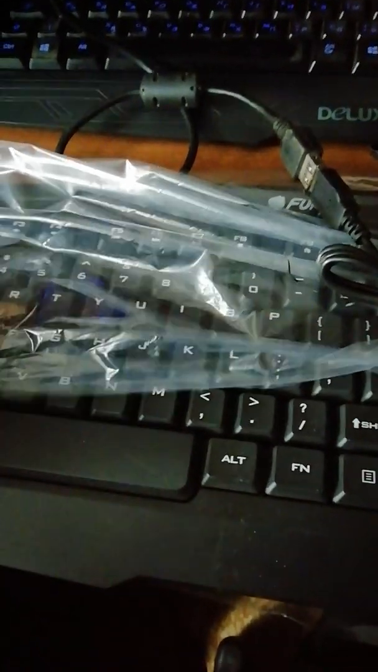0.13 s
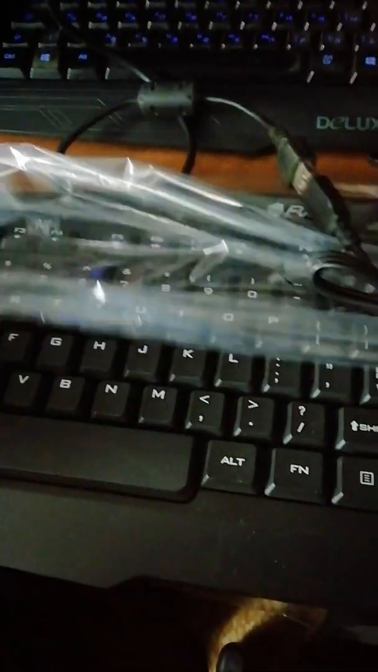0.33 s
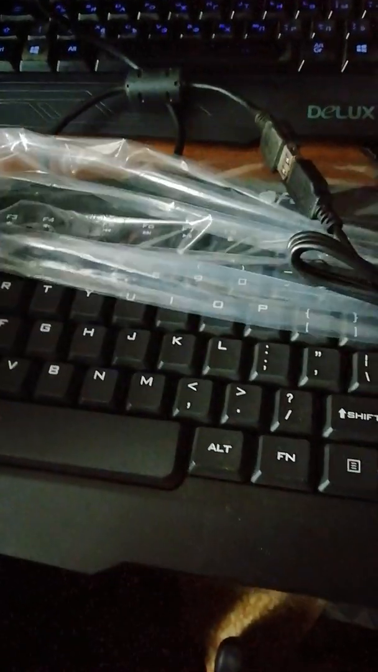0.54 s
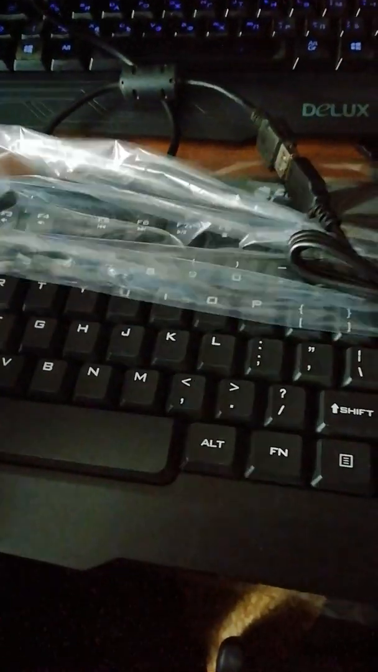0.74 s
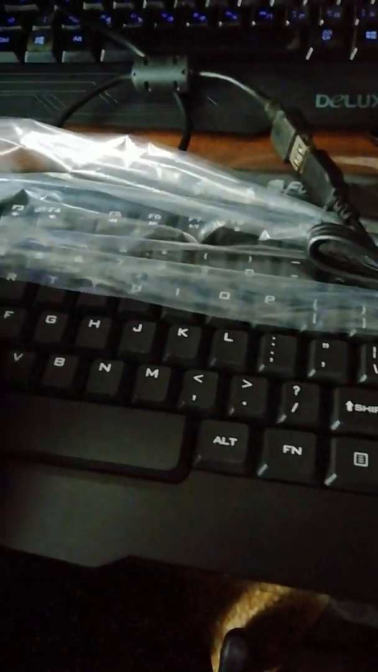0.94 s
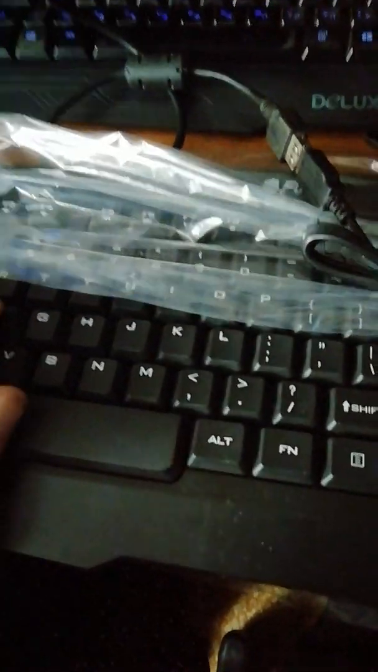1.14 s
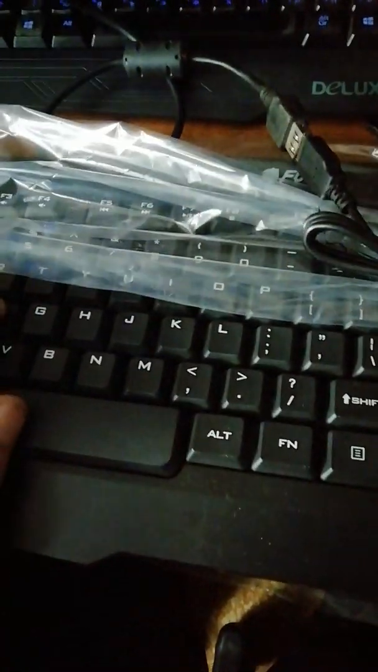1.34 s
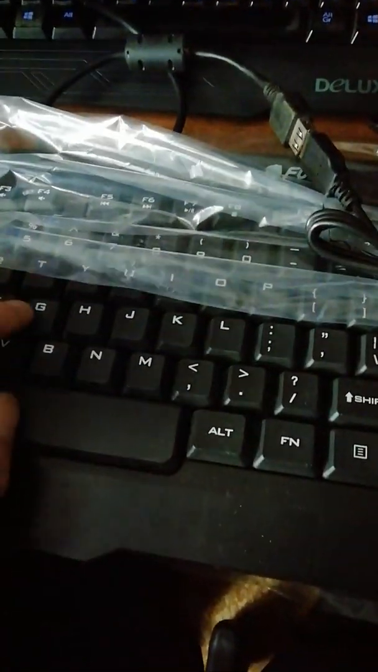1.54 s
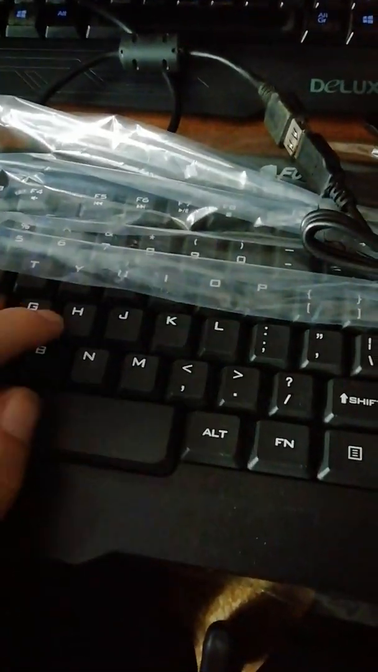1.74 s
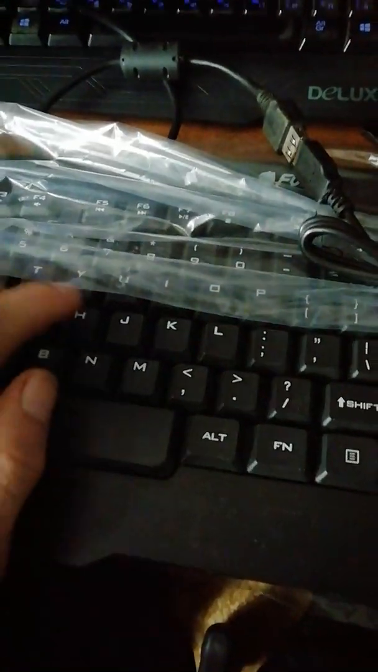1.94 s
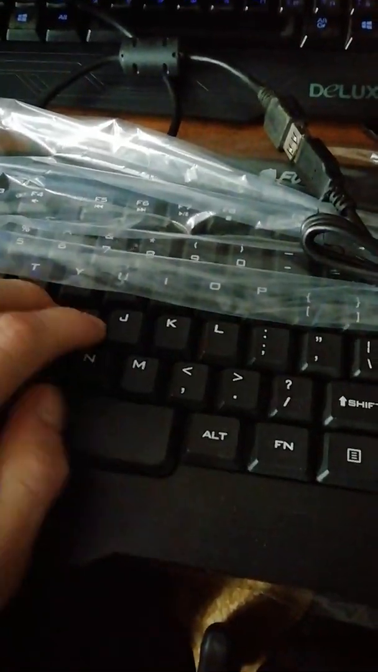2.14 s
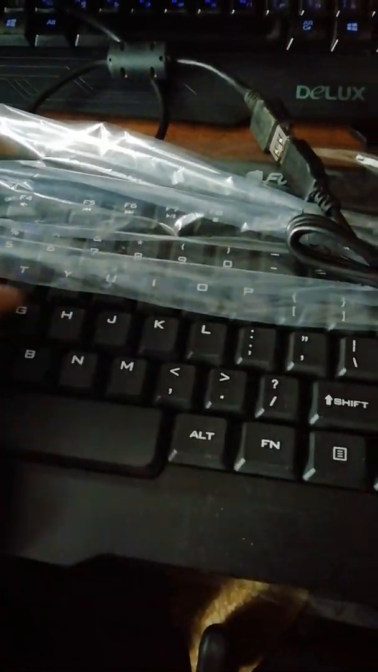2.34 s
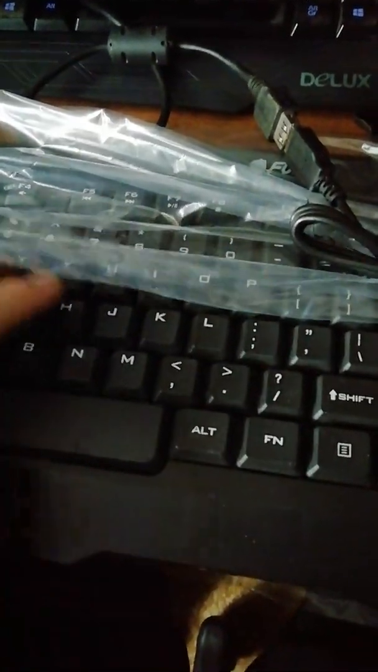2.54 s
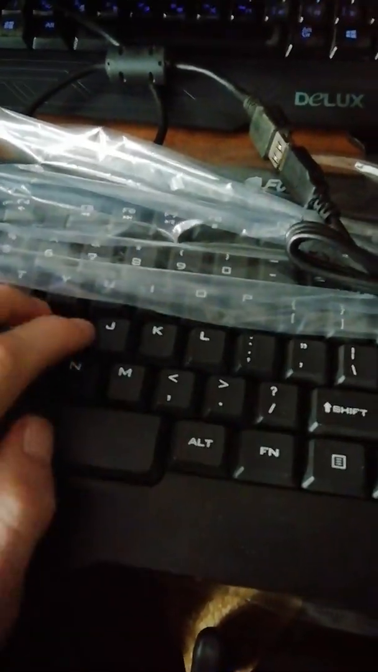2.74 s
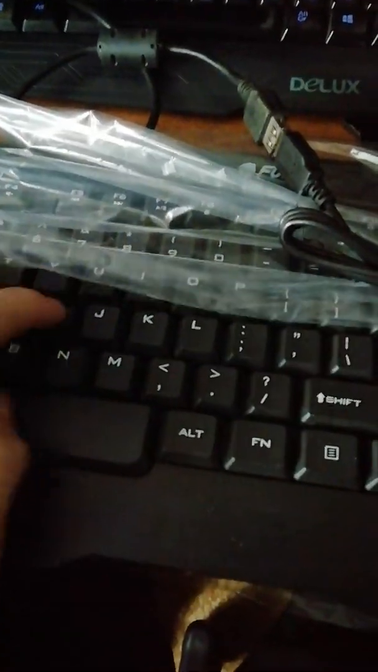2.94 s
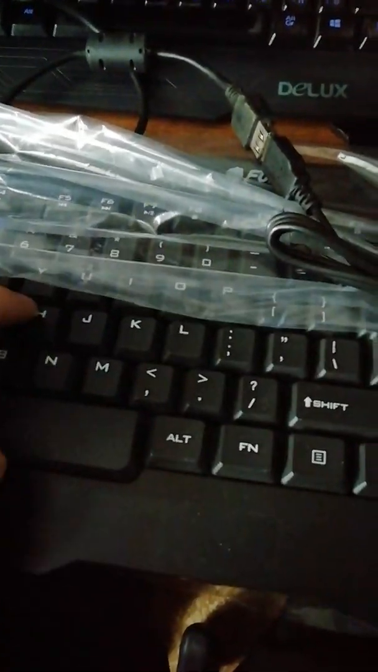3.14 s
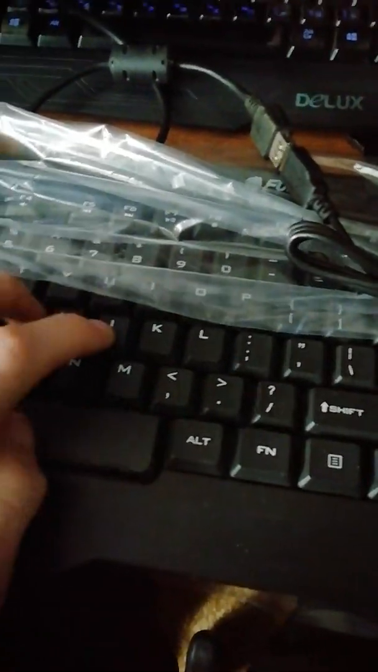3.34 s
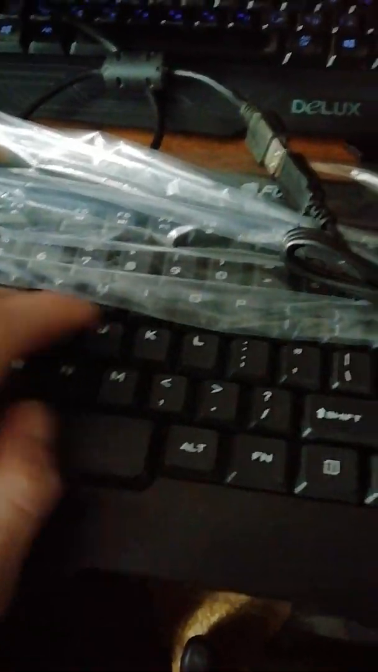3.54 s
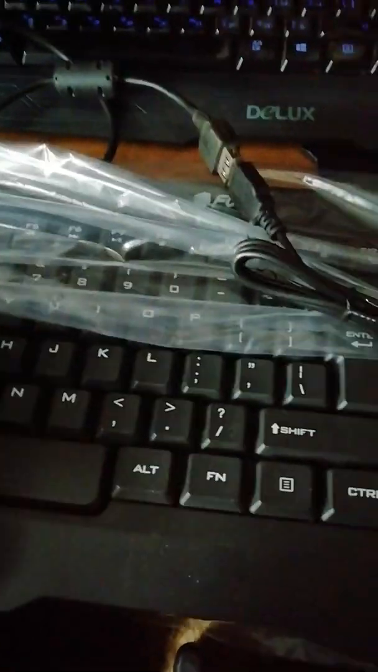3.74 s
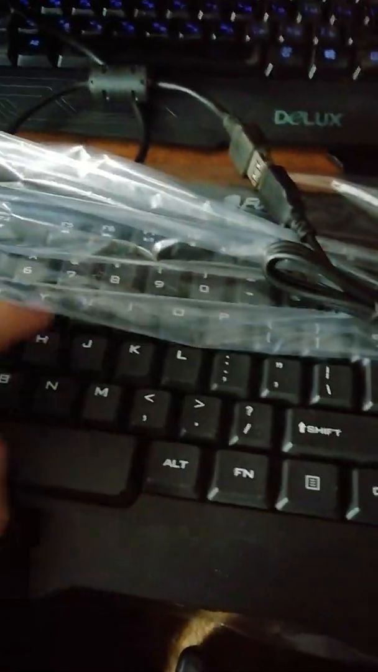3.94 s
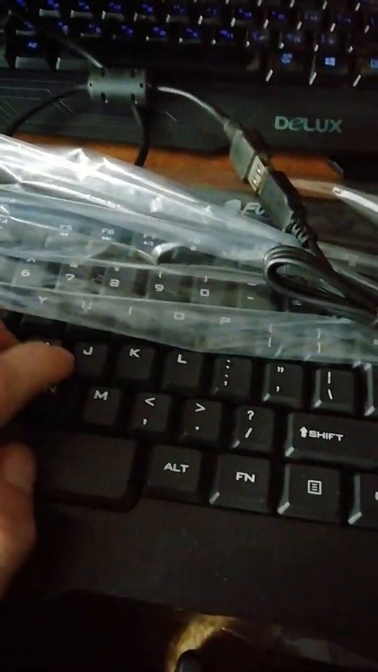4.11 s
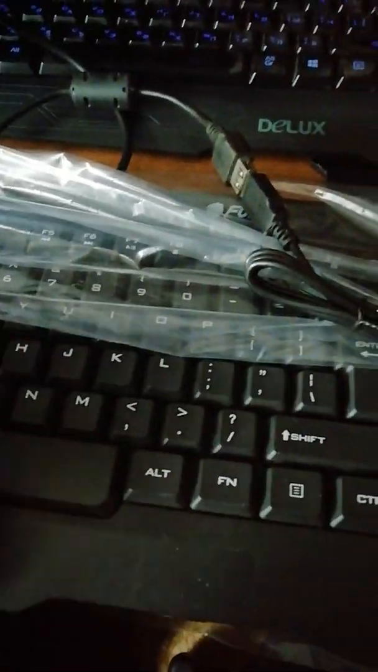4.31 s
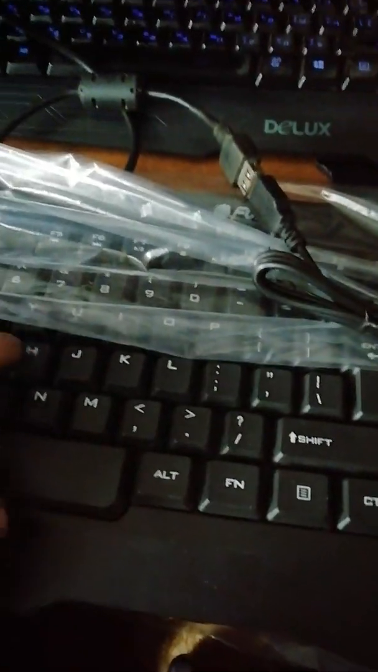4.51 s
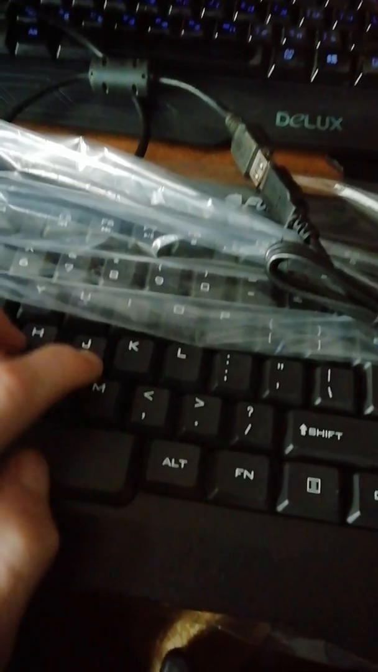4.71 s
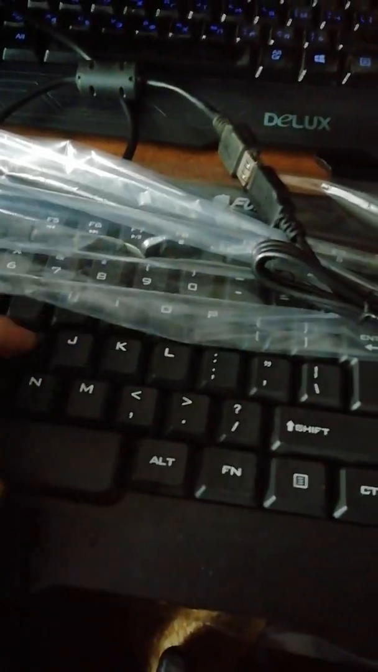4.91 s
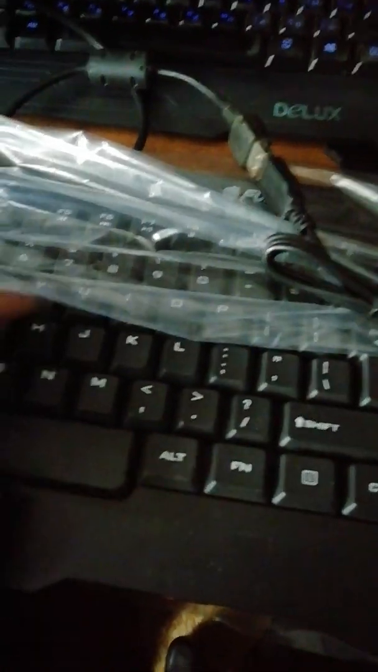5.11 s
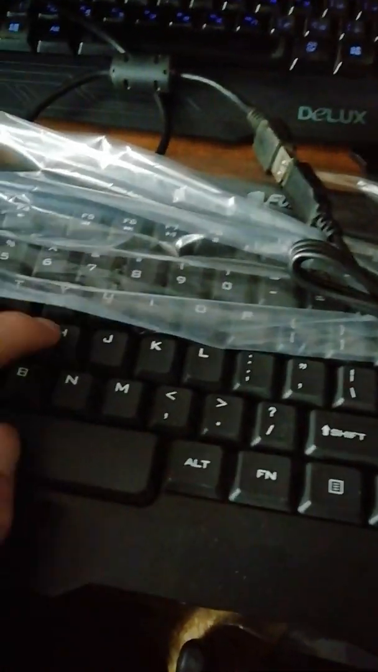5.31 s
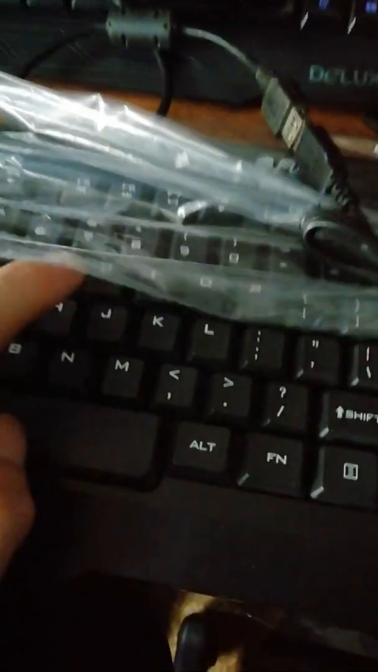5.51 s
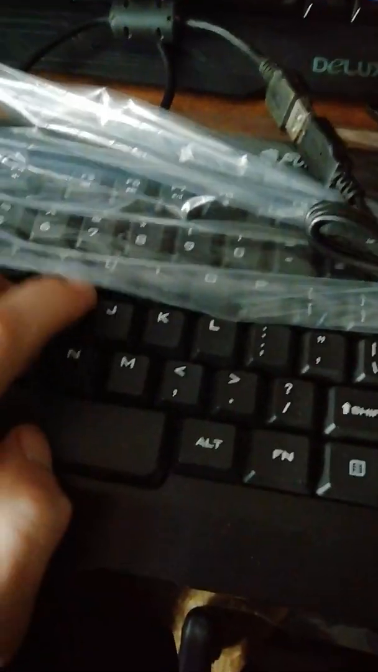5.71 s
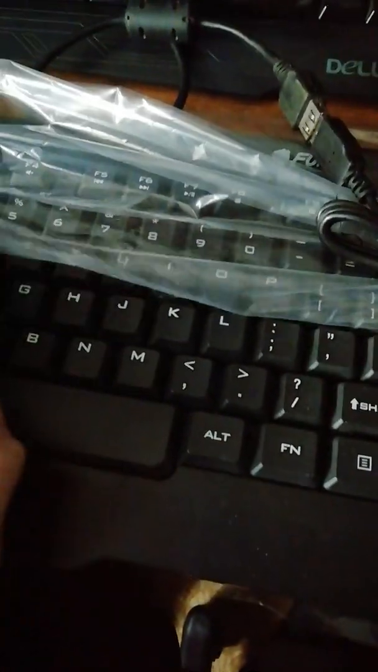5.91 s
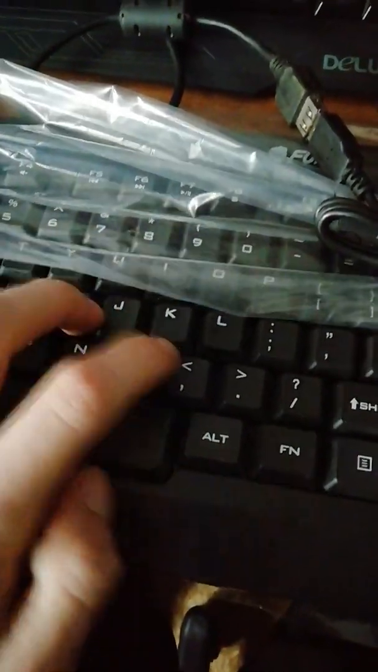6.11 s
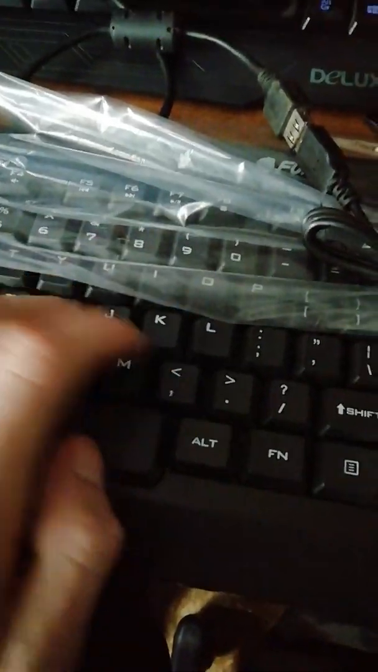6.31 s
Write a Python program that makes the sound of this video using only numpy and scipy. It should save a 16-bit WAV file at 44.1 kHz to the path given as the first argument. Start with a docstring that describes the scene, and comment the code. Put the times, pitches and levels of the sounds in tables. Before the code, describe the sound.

Close crackle of plastic wrap, then hollow, clacky keyboard presses, sparse at first and soon fast and irregular, over faint room hum.

```python
"""In a small quiet room, a thin plastic cover is pushed back, crinkling, off a computer keyboard; then
fingers type in quick uneven runs. Each key contact is a short noise rattle ringing the case and the cap.
Pushing and soft rustles are crackling noise, creases snap in short bright bursts; dull thuds mark the hand.
A hand-held camera hears it closely through two ports that ring in the treble, over air, hum and rumble."""
import sys
import numpy as np
from scipy import signal
from scipy.fft import rfft, irfft, next_fast_len
from scipy.io import wavfile
from scipy.ndimage import map_coordinates

SR = 44100
rng = np.random.default_rng(int(sys.argv[2]) if len(sys.argv) > 2 else 0)


def store_pcm(level_fs):
    """Save levels as 16-bit WAV."""
    pcm = np.round(np.clip(level_fs, -1, 1) * 32767).astype(np.int16)
    wavfile.write(sys.argv[1], SR, np.atleast_2d(pcm).T)


N = 284621  # length in samples
APPROACH_S = .015  # room left before each contact for its sound to swell
TOP_HZ = 16300  # the camera's band limit


def amp(db):
    """Turn decibels into a gain."""
    return 10 ** (np.asarray(db) / 20)


def unit(x):
    """Scale a sound to an rms of 1."""
    return x / np.sqrt(np.mean(x ** 2) + 1e-20)


def along(points, hz):
    """Read a table of (Hz, value) points, with straight lines between them on a log frequency axis."""
    point_hz, values = np.transpose(points)
    return np.interp(np.log(hz + 1), np.log(point_hz + 1), values)


def level(rows):
    """Turn (seconds, dB) rows into a gain for each sample, silent outside the rows."""
    s, db = np.transpose(rows)
    return np.interp(np.arange(N) / SR, s, amp(db), left=0, right=0)


def filtered(x, response):
    """Multiply the spectrum of x by a response that depends on frequency."""
    length = x.shape[-1]
    padded = next_fast_len(length + length // 8)
    spectrum = rfft(x, padded) * response(np.fft.rfftfreq(padded, 1 / SR))
    return irfft(spectrum, padded)[..., :length]


def port_db(hz):
    """The air in each microphone port resonates, lifting the treble around one frequency."""
    centre_hz, width_hz, peak_db = 8570, 750, 11.5
    return peak_db / (1 + ((hz - centre_hz) / width_hz) ** 2)


def tinted(x, colour):
    """Give a steady sound its colour, heard through the ports, at an rms of 1."""
    return unit(filtered(x, lambda hz: amp(along(colour, hz) + port_db(hz))))


def ring(colour, uneven_db, edge_db, size=2048):
    """How a struck part rings: its colour plus random peaks and dips, heard through the ports."""
    hz = np.fft.rfftfreq(size, 1 / SR)
    spot = map_coordinates(rng.standard_normal(64), [np.sqrt(hz) / 4])
    spot = spot / (1 + (hz / 10000) ** 2)  # resonances crowd and even out in the treble
    edge = edge_db * np.minimum(hz / TOP_HZ, 1)
    response_db = along(colour, hz) + uneven_db * spot + edge + port_db(hz)
    # folding the cepstrum (the spectrum of the log spectrum) makes the ring start at once and die away
    cepstrum = irfft(np.log(amp(response_db)))
    cepstrum[1:size // 2] *= 2
    cepstrum[size // 2 + 1:] = 0
    return irfft(np.exp(rfft(cepstrum)))


def burst(colour, decay_ms, spiky, uneven_db, apart, after_db, after_ms, size=4096):
    """One contact: a rattle of tiny impacts of energy 1, wrapped in a weak shiver of the parts around it."""
    ms = 1000 * (np.arange(size) / SR - APPROACH_S)
    ms = ms - 0.5 * decay_ms  # the rattle peaks just after the first impact

    def swell(rise_ms, fall_ms):
        return np.exp(np.minimum(ms / rise_ms, -ms / fall_ms))

    sizes = np.exp(spiky * np.clip(rng.standard_normal(size), -2, 2))
    # one noise shared by both ports, plus one of their own
    hits = rng.standard_normal(size) + apart * rng.standard_normal((2, size))
    rattle = swell(.45 * decay_ms, .85 * decay_ms) * sizes * hits
    shiver = swell(0.65 * after_ms, after_ms) * rng.standard_normal((2, size))
    body = ring(colour, uneven_db, edge_db=4.9 * np.log(6.0 / decay_ms))  # a brief contact is brighter

    def rung(force):
        return unit(signal.fftconvolve(force, body[None], axes=1)) / np.sqrt(size)

    return rung(rattle) + amp(after_db) * rung(shiver)


def add(track, s, sound):
    """Mix a contact into the track so that it lands at time s."""
    first = max(round((s - APPROACH_S) * SR), 0)
    part = track[:, first:][:, :sound.shape[1]]
    part += sound[:, :part.shape[1]]


def crackle(per_second, scatter_db, life_ms, smooth, size=512):
    """Stereo friction noise: tiny slips of uneven size over a smooth hiss."""
    slip_sizes = amp(scatter_db * np.minimum(rng.exponential(size=N), 2))
    slips = (rng.random(N) < per_second / SR) * slip_sizes
    decay = np.exp(-np.arange(size) / (life_ms * SR / 10 ** 3))
    strength = unit(signal.fftconvolve(slips, decay)[:N]) + smooth
    return strength * (rng.standard_normal(N) + 1.16 * rng.standard_normal((2, N)))


# Key contacts: fingertip landings and bottoming clicks.
# Each row: time in seconds, energy of the case knock in dB, energy of the cap click in dB (before trims).
KEY_CONTACTS = [(1.09, -35, -26.5), (1.221, -26.5, -26.5), (1.285, -42, -24.5), (1.349, -27.5, -12),
                (1.402, -15, -7), (1.497, -25, -25.5), (1.555, -21.5, -13), (1.598, -28, -22),
                (1.722, -33, -19), (1.852, -23, -21.5), (1.956, -13, -11.5), (2.065, -29, -22.5),
                (2.568, -23, -18.5), (2.667, -31.5, -28.5), (2.76, -35, -28.5), (2.902, -23.5, -11.5),
                (3.069, -31, -26), (3.202, -29.5, -25), (3.276, -21.5, -15), (3.439, -34.5, -19.5),
                (3.491, -23.5, -25), (3.557, -17, -16), (3.603, -14, -7.5), (3.644, -34, -9.5),
                (3.777, -13.5, -15.5), (3.824, -21, -11.5), (3.901, -20, -8.5), (3.908, -16, -4),
                (3.984, -12, -19), (4.016, -26.5, -16.5), (4.099, -31, -27.5), (4.147, -39, -21.5),
                (4.202, -17.5, -12.5), (4.223, -19.5, -13.5), (4.287, -19, -18.5), (4.306, -15.5, -10.5),
                (4.422, -19, -22.5), (4.445, -20, -13), (4.485, -23, -19.5), (4.535, -17.5, -15.5),
                (4.578, -25, -18), (4.602, -20, -15), (4.658, -24.5, -21.5), (4.699, -32, -25),
                (4.772, -17, -24.5), (4.871, -18.5, -12), (4.892, -13, -13), (4.963, -22.5, -13),
                (5.001, -20, -13.5), (5.077, -11.5, -10.5), (5.251, -17, -6), (5.257, -15, -2.5),
                (5.274, -22, -13.5), (5.314, -13, -9.5), (5.422, -12.5, -15), (5.429, -10, -5),
                (5.441, -23, -12), (5.525, -17.5, -15.5), (5.553, -19.5, -5), (5.604, -36, -14),
                (5.656, -22.5, -8.5), (5.687, -17, -17), (5.744, -14, -4.5), (5.829, -14.5, -4.5),
                (5.967, -16.5, -19), (6.041, -15.5, -15), (6.097, -18, -13.5), (6.259, -23.5, -22),
                (6.346, -30, -34.5), (6.418, -17.5, -13), (6.446, -28, -15.5)]
REBOUND_S, REBOUND_DB = .0055, -11.5  # typical delay of the bounce, and its level against the contact
TICK_S, TICK_SPREAD = .032, .4  # typical delay of the light tick, and its random spread (log scale)
TICK_KNOCK_DB, TICK_CLICK_DB = -17.5, -14.5  # the tick's levels against the contact


def keys():
    """Each contact bounces once, and a light tick follows at a random delay; each rings its own way."""
    out = np.zeros((2, N))
    timing = rng.standard_normal((len(KEY_CONTACTS), 2))
    for (s, knock_db, click_db), (bounce, tick) in zip(KEY_CONTACTS, timing):
        add(out, s, contact(knock_db, click_db))
        rebound_s = s + REBOUND_S * np.exp(.25 * bounce)
        add(out, rebound_s, contact(knock_db + REBOUND_DB, click_db + REBOUND_DB))
        tick_s = s + TICK_S * np.exp(TICK_SPREAD * tick)
        add(out, tick_s, contact(knock_db + TICK_KNOCK_DB, click_db + TICK_CLICK_DB))
    return out


# Colour of the hollow case when knocked. Each row: frequency in Hz, relative level in dB.
CASE_COLOUR = [(50, -44), (160, -28), (410, -5.5), (520, -16), (670, 3), (1150, -0.5), (1500, -17),
               (2300, -12), (4000, -31.5), (16000, -62)]
# Colour of the plastic key cap. Each row: frequency in Hz, relative level in dB.
CAP_COLOUR = [(100, -36.5), (1200, -9.5), (2100, -8), (4000, -7.5), (5700, -15), (8500, -10), (11000, -30),
              (16000, -41)]
# A nail is brief, a fingertip slow.
# Each row: how far the click exceeds the knock in dB, base rattle length in ms (scaled for each part).
TOUCH = [(-1, 3.9), (0, 3.85), (8, 2.63), (25, 1.54)]
KNOCK_DB, CLICK_DB = -2, -1.5  # trims for all contacts


def contact(knock_db, click_db):
    """A touch on a key: the hollow case knocks and the cap rattles, more briefly for a harder touch."""
    hardness_db, base_ms = np.transpose(TOUCH)
    decay_ms = np.interp(click_db - knock_db, hardness_db, base_ms)
    knock = burst(CASE_COLOUR, .8 * decay_ms, spiky=.3, uneven_db=2, apart=.2, after_db=-10, after_ms=7)
    click = burst(CAP_COLOUR, .95 * decay_ms, spiky=.5, uneven_db=2.4, apart=1.1, after_db=-10, after_ms=9)
    return amp(knock_db + KNOCK_DB) * knock + amp(click_db + CLICK_DB) * click


RUB_RISE_S, RUB_FALL_S = .003, 0.074
RUB_DB, RUB_FOLLOWS = -43.5, 0.75  # trim, and dB of rub for each dB of click: louder clicks rub more


def fingers():
    """Around each contact the fingertip rubs and jiggles the loose cap, a crackle that soon fades."""
    t = np.arange(N) / SR
    power = np.zeros(N)
    for s, _, click_db in KEY_CONTACTS:
        fade = np.minimum((t - s) / RUB_RISE_S, (s - t) / RUB_FALL_S)
        power += amp(RUB_FOLLOWS * click_db) ** 2 * np.exp(2 * np.maximum(fade, -20))
    rubbing = crackle(per_second=120, scatter_db=2.5, life_ms=2.2, smooth=0.13)
    return amp(RUB_DB) * np.sqrt(power) * tinted(rubbing, CAP_COLOUR)


# The film being pushed back off the keys. Each row: time in seconds, level in dB (before the shared gain).
PUSH_LEVEL = [(0, -45.5), (0.049, -45.5), (0.073, -56), (.14, -49), (.26, -43.5), (.33, -48.5), (.4, -42),
              (.55, -48), (.6, -62), (.73, -48.5), (.85, -58), (1.13, -78)]
# Soft rustling slides of fingers over caps and film.
# Each row: start in seconds, length in seconds, level reached at the end in dB (before the shared gain).
RUSTLES = [(2.196, .36, -52.5), (2.829, 0.18, -60.5), (3.173, .18, -57.5), (5.134, 0.08, -49),
           (5.77, 0.21, -59.5)]
# Colour of the thin film. Each row: frequency in Hz, relative level in dB.
FILM_COLOUR = [(60, -42), (200, -12.5), (550, -18), (1300, -6), (2200, -9), (7000, -10), (9500, -5.5),
               (16000, -73)]
RUSTLE_ATTACK_S, RUSTLE_SWELL_DB, RUSTLE_RELEASE_S = 0.013, 7, 0.037
SHARED_GAIN_DB = 7


def film():
    """The sheet crackles as it is pushed and crumples; after that each soft rustle swells and lets go."""
    t = np.arange(N) / SR
    crumpling = crackle(per_second=300, scatter_db=9, life_ms=.8, smooth=.3)
    rustling = crackle(per_second=510, scatter_db=7, life_ms=1.0, smooth=0.83)
    rustle_level = np.zeros(N)
    for s, length, db in RUSTLES:
        attack = np.clip((t - s) / RUSTLE_ATTACK_S, 0, 1)
        release = np.exp(-np.maximum(t - s - length, 0) / RUSTLE_RELEASE_S)
        swell_db = RUSTLE_SWELL_DB * np.clip((t - s) / length - 1, -1, 0)
        rustle_level += attack * release * amp(db + swell_db)
    pushed = level(PUSH_LEVEL) * tinted(crumpling, FILM_COLOUR)
    return amp(SHARED_GAIN_DB) * (pushed + rustle_level * tinted(rustling, FILM_COLOUR))


# Big creases of the film snapping over. Each row: time in seconds, energy in dB (before the snap trim).
BIG_CREASES = [(.037, -18), (.141, -2), (.191, -5), (.202, 4), (.225, -3.5), (.253, 0), (.26, 8),
               (.312, -6), (.386, -5), (.394, -2), (.435, -6.5), (.443, -3), (.5, -6.5), (.53, -9),
               (.636, -12), (.704, -3.5), (.77, -10), (.827, -7), (.858, -16), (.968, -15.5), (1.16, -26),
               (1.362, -11), (2.211, -19.5), (2.403, -7), (2.444, -3.5), (2.471, -13), (2.508, -2.5),
               (2.843, -15), (2.89, -11), (3.387, -11), (3.617, -0.5), (3.754, -11), (3.847, -3),
               (4.846, -11.5), (5.152, -10.5), (5.189, -6.5), (5.206, -7), (5.91, -9)]
# Colour of a snapping crease. Each row: frequency in Hz, relative level in dB.
CREASE_COLOUR = [(100, -54), (1300, -8), (3000, -12), (7000, -0.5), (10500, -6.5), (16000, -27.5)]
SNAP_MS, SNAP_DB = 0.76, -4  # base length and trim shared by all creases
# small creases give way under the push: average rate, energy against the push level, random spread
PUSH_SNAPS_PER_S, PUSH_SNAP_DB, PUSH_SNAP_SCATTER_DB = 46, 32, 2


def snaps(count=64):
    """Creases snap brightly one by one: the big ones, and small ones at random that follow the push."""
    out = np.zeros((2, N))
    gaps = rng.uniform(.2, 1.8, count)
    sizes = rng.standard_normal(count)
    times = np.cumsum(gaps) / PUSH_SNAPS_PER_S
    push_s, push_db = np.transpose(PUSH_LEVEL)
    small_db = np.interp(times, push_s, push_db) + PUSH_SNAP_DB + PUSH_SNAP_SCATTER_DB * sizes
    for s, db in [*BIG_CREASES, *np.column_stack([times, small_db])]:
        snap = burst(CREASE_COLOUR, SNAP_MS, spiky=.45, uneven_db=2.2, apart=.9, after_db=-11, after_ms=10)
        add(out, s, amp(db + SNAP_DB) * snap)
    return out


# The hand landing heavily on the keyboard. Each row: time in seconds, energy in dB.
HAND_THUMPS = [(.26, -27.5), (0.381, -19), (.42, -27), (1.552, -28), (5.255, -16.5), (5.424, -24),
               (5.555, -26)]
# Colour of the thud. Each row: frequency in Hz, relative level in dB.
THUD_COLOUR = [(30, -2), (70, -9.5), (190, 1), (400, -11), (1200, -53)]


def thumps():
    """The soft weight of the hand sounds the desk under the keyboard, in slow dull bursts."""
    out = np.zeros((2, N))
    for s, db in HAND_THUMPS:
        thud = burst(THUD_COLOUR, 18, spiky=0, uneven_db=0, apart=0, after_db=-12, after_ms=20)
        add(out, s, amp(db) * thud)
    return out


# How long the room rings. Each row: frequency in Hz, time to fall by 60 dB in seconds.
ROOM_DECAY = [(1000, 0.19), (8000, 0.1), (15000, 0.11)]


def room(x, size=16384):
    """The small room's short answer: a fresh random diffuse tail at each port for each stretch of sound."""
    out = np.zeros((2, N + 3 * size))
    gap = round(.005 * SR)  # the answer starts 5 ms late
    step = size // 2
    for start in range(0, N, step):
        # fading noise, faster or slower at each frequency
        hz, t, noise = signal.stft(rng.standard_normal((2, size)), SR, nperseg=256)
        fade = amp(-60 * t / along(ROOM_DECAY, hz)[:, None])
        tail = signal.istft(noise * fade, SR, nperseg=256)[1]
        tail = tail / np.linalg.norm(tail[0])
        answer = signal.fftconvolve(x[:, start:start + step], tail, axes=1)
        out[:, start + gap:][:, :answer.shape[1]] += answer
    return out[:, :N]


# The desk and the hand on the camera rumbling. Each row: time in seconds, level in dB.
RUMBLE_LEVEL = [(0, -67), (3.1, -72), (3.35, -63.5), (4.3, -67), (5.1, -67), (5.5, -54), (6.2, -67)]
# Colour of that rumble. Each row: frequency in Hz, relative level in dB.
DESK_COLOUR = [(25, 3), (70, 9), (220, -5.5), (380, -6.5), (1500, -59)]
# Colour of the room air. Each row: frequency in Hz, relative level in dB.
AIR_COLOUR = [(20, 16.5), (130, 4.5), (350, 3), (490, -6.5), (950, -3), (2100, -11), (4700, -17.5),
              (8500, -23), (11000, -23), (16000, -24.5)]
# A computer's steady tones. Each row: frequency in Hz, rms level in dB.
HUM_TONES = [(119.5, -72.5), (177, -79), (307, -87.5)]


def background():
    """Noise for the room air, sine tones for a faint hum, and lumpy low noise for the rumble of handling."""
    t = np.arange(N) / SR
    hum = np.zeros(N)
    for hz, db in HUM_TONES:
        hum += amp(db) * np.sqrt(2) * np.sin(2 * np.pi * (hz * t + rng.random()))
    # long waves reach both ports alike, so the side signal loses its bass
    mid, side = rng.standard_normal((2, N))
    side = filtered(side, lambda hz: hz / np.hypot(hz, 450))
    air = amp(-61.0) * tinted(np.array([mid + side, mid - side]), AIR_COLOUR)
    wander = unit(filtered(rng.standard_normal(N), lambda hz: np.exp(-hz / 9)))
    lumps = amp(3.5 * wander)
    rumble = unit(lumps * tinted(rng.standard_normal(N), DESK_COLOUR))
    return air + hum + level(RUMBLE_LEVEL) * rumble


# How far the left port leads the right. Each row: frequency in Hz, lead in radians.
PORT_LEAD = [(250, 1), (700, 2.5), (1030, 1.22), (1600, -0.1), (2200, 3), (5000, 5.5), (8800, 20.5),
             (16000, 35)]
# How the two ports differ in loudness. Each row: frequency in Hz, left minus right in dB.
PORT_BALANCE = [(400, 1), (600, 1.5), (850, 19.5), (1150, 6), (1500, -2), (2300, 4.5), (4400, 4), (8500, 6),
                (11000, 2)]


def scene():
    """The keyboard lies to the left: phase and level differ between the ports, mostly in favour of the left."""
    sides = np.array([[1], [-1]])  # left, right
    near = keys() + film() + snaps() + fingers()
    near = filtered(near, lambda hz: np.exp(sides * 1j * along(PORT_LEAD, hz) / 2))
    near = near + amp(-11) * room(near)
    # share the level between the ports, keeping the total power
    near = filtered(near, lambda hz: np.sqrt(2 / (1 + amp(-sides * along(PORT_BALANCE, hz)) ** 2)))
    return near + thumps() + background()


def record(dry):
    """The camera keeps nothing above its band limit."""
    return filtered(dry, lambda hz: hz < TOP_HZ)


dry = scene()
out = record(dry)
store_pcm(out)
```